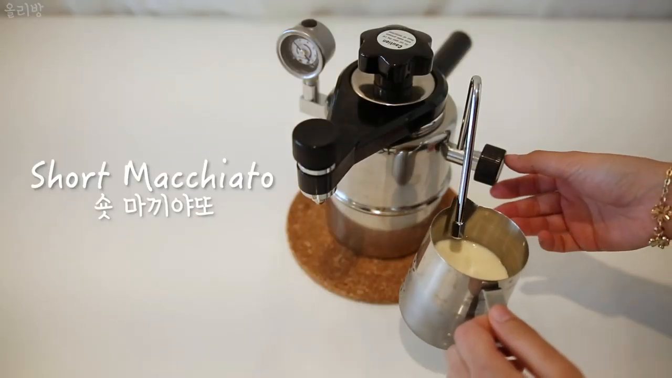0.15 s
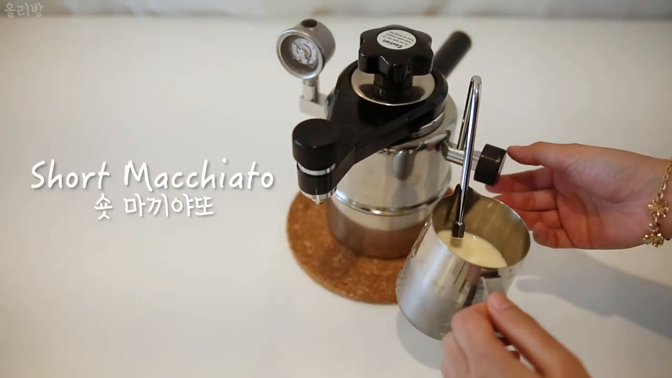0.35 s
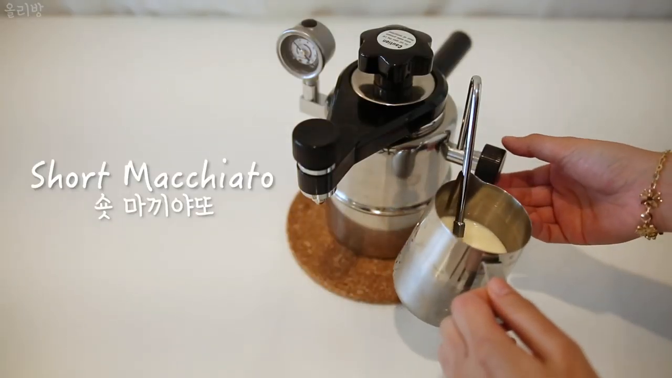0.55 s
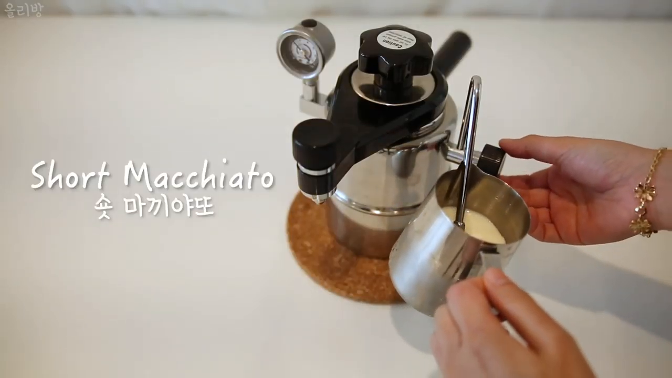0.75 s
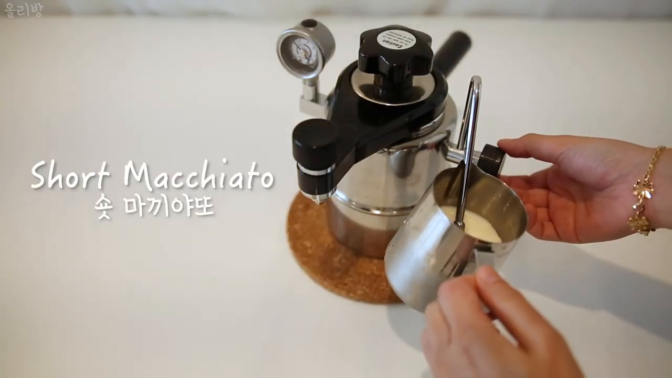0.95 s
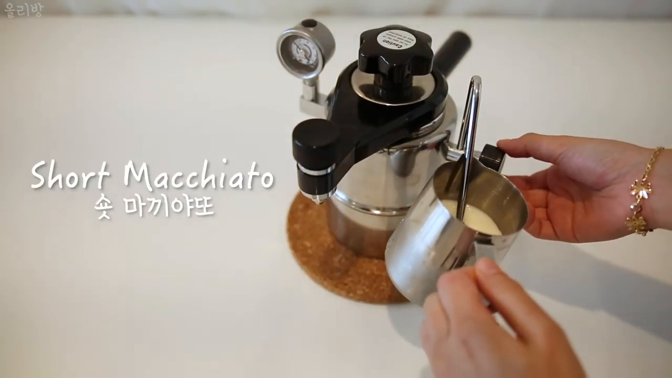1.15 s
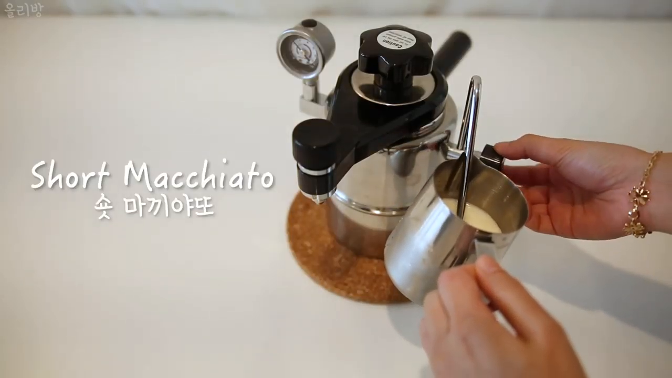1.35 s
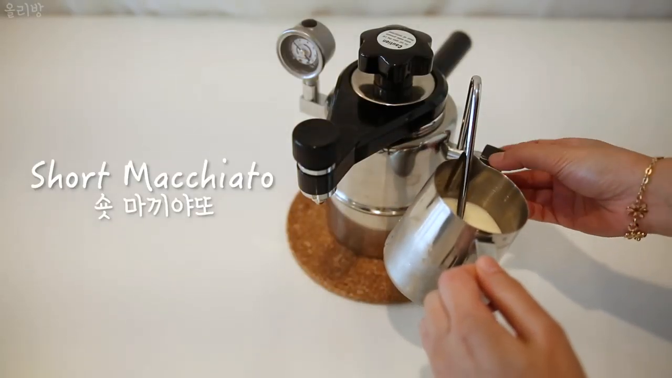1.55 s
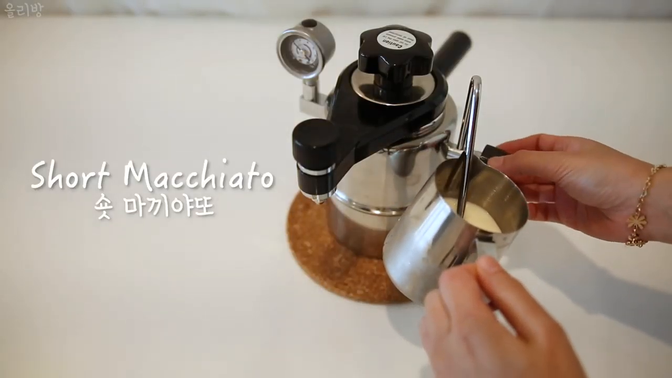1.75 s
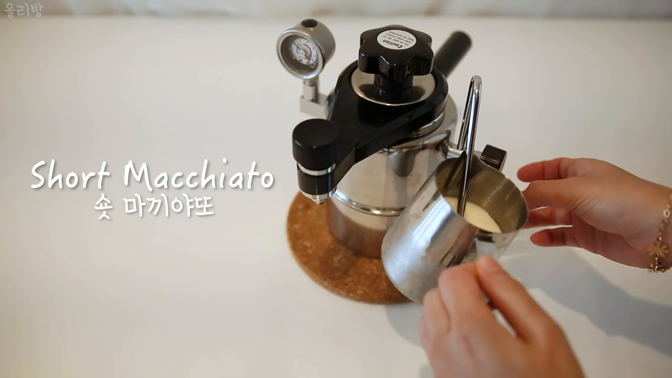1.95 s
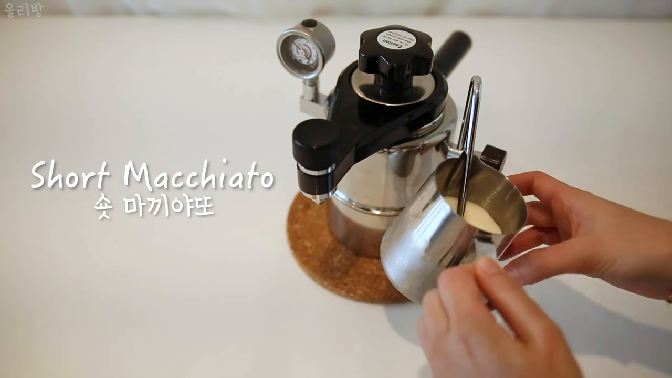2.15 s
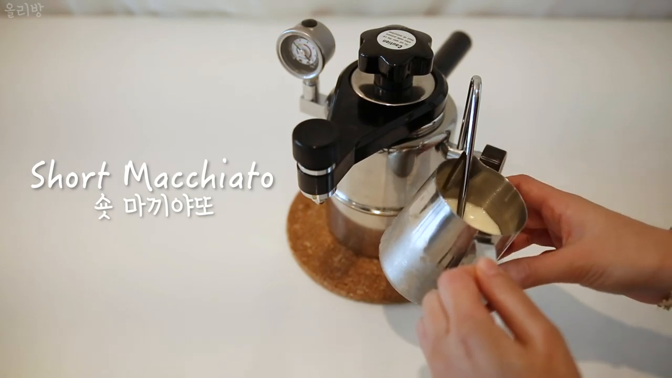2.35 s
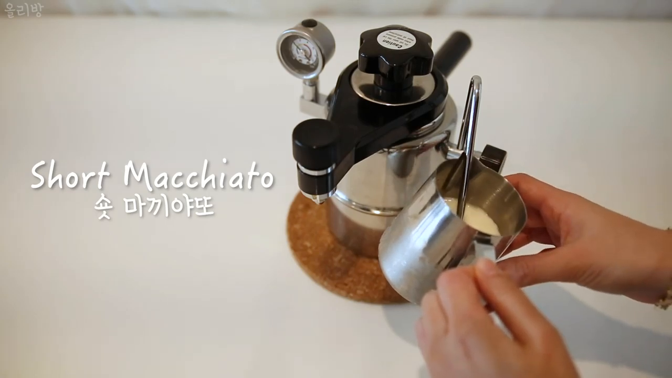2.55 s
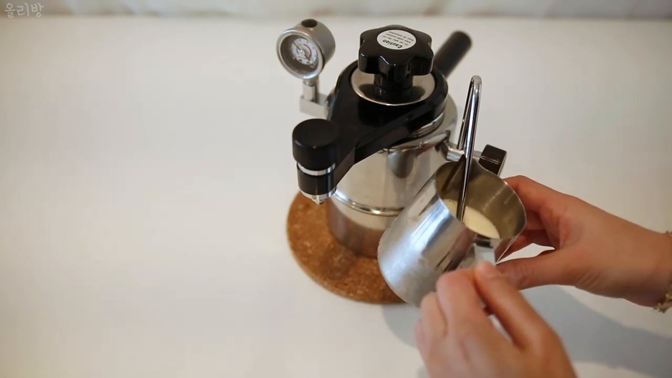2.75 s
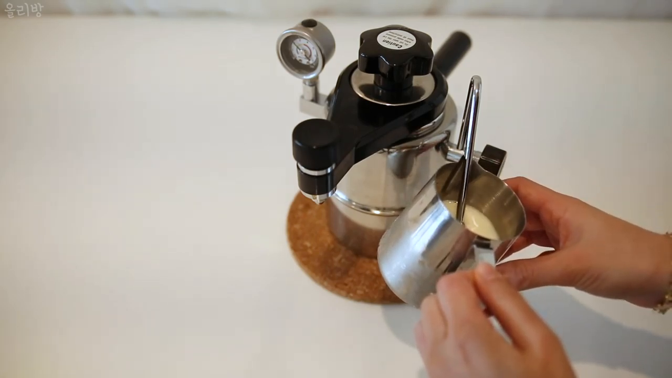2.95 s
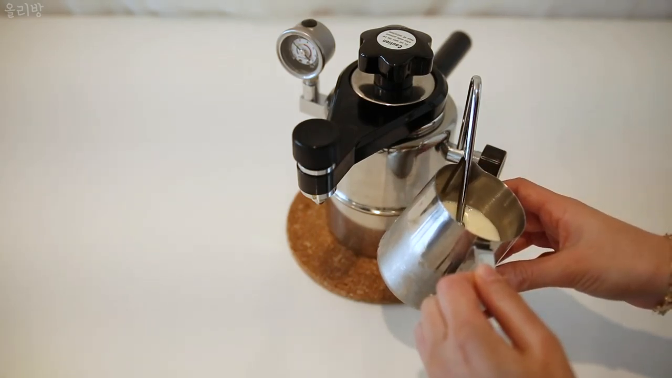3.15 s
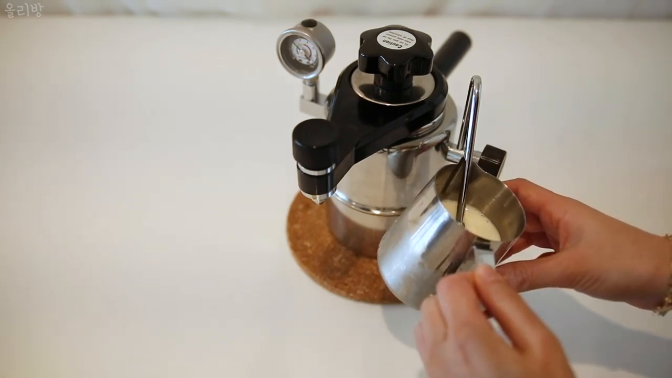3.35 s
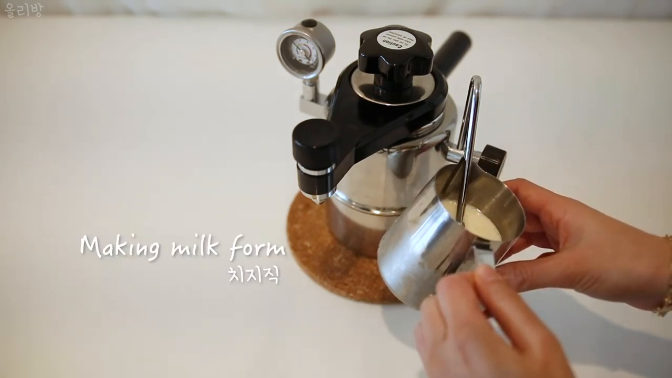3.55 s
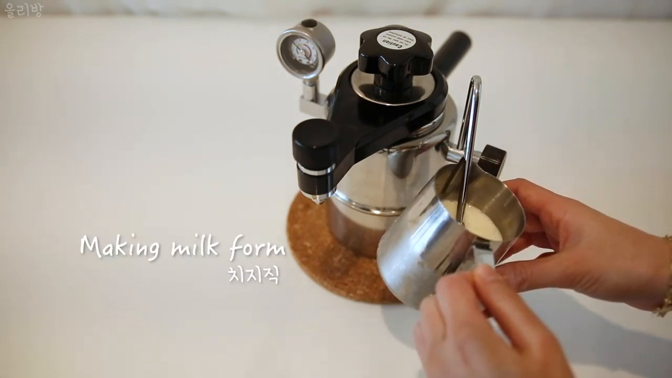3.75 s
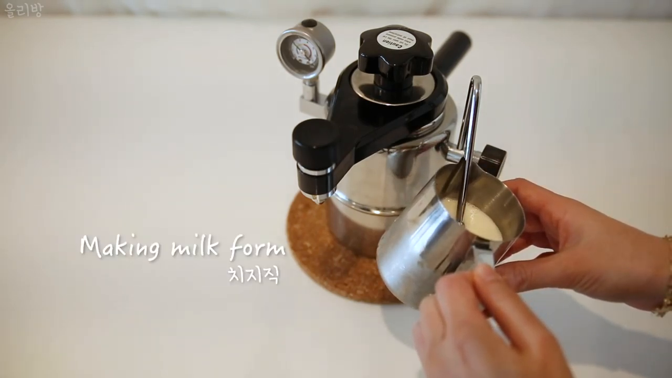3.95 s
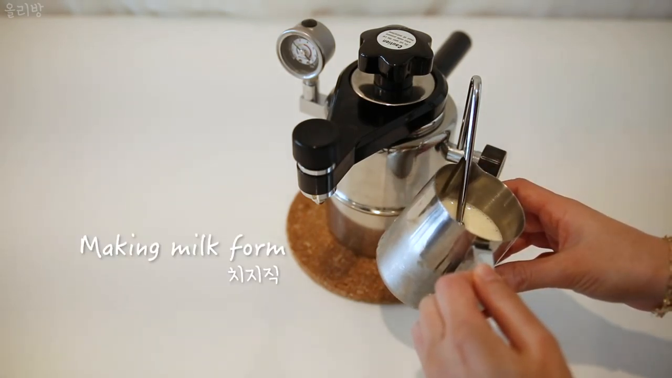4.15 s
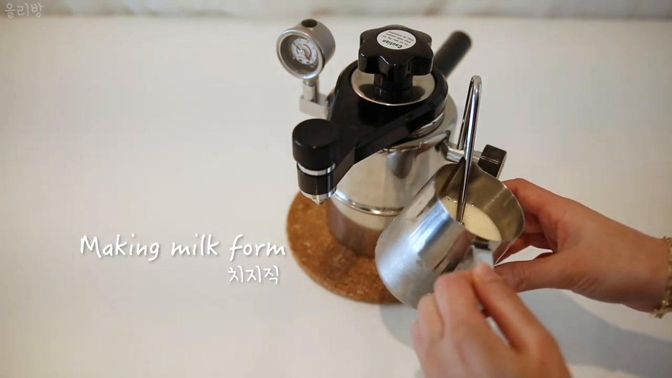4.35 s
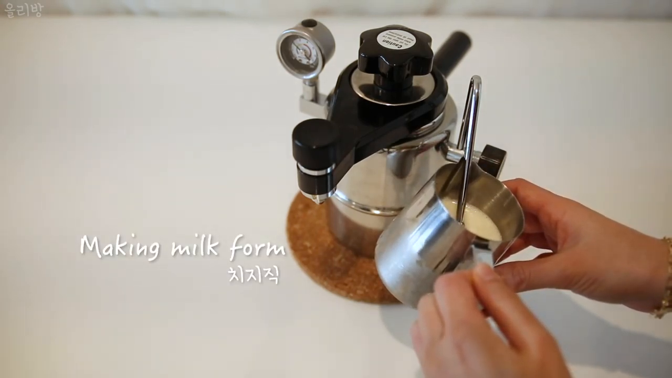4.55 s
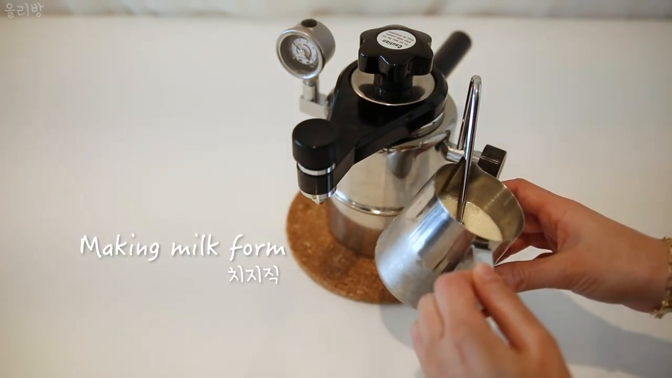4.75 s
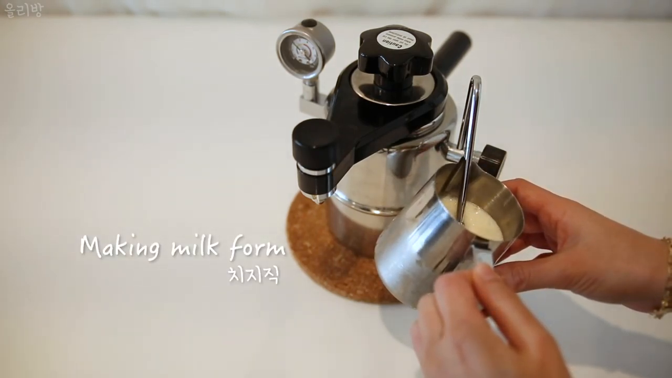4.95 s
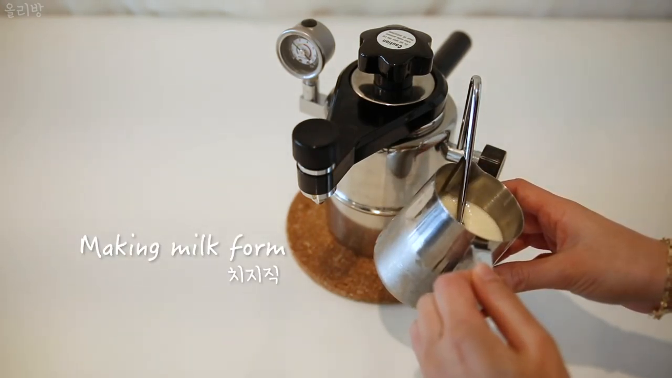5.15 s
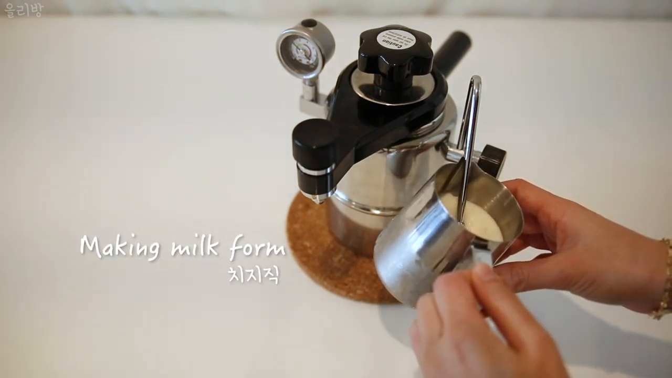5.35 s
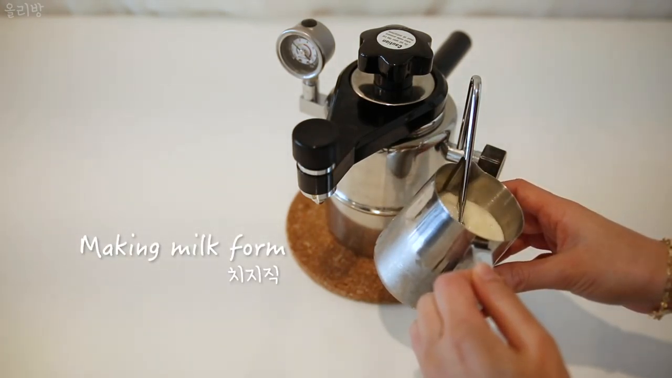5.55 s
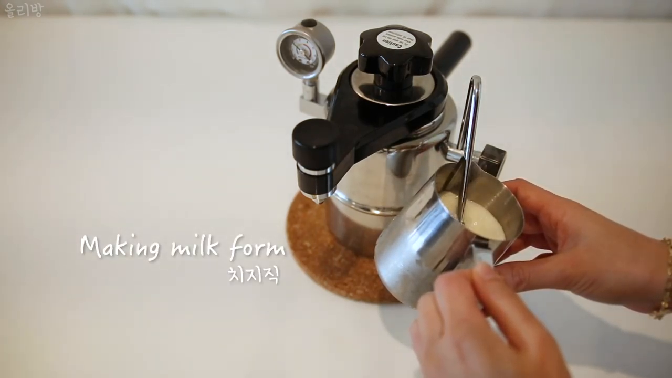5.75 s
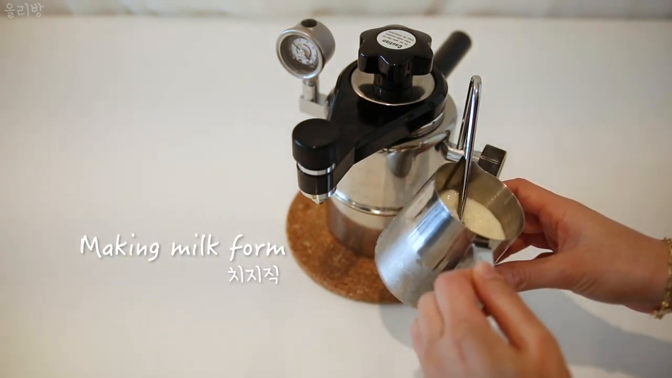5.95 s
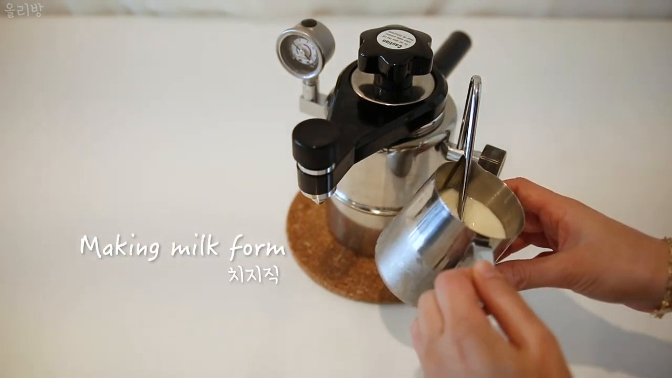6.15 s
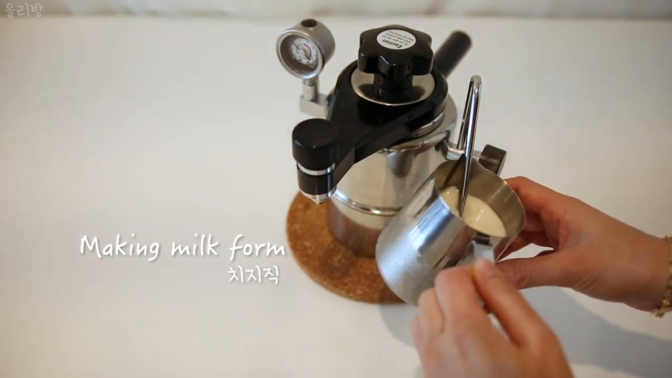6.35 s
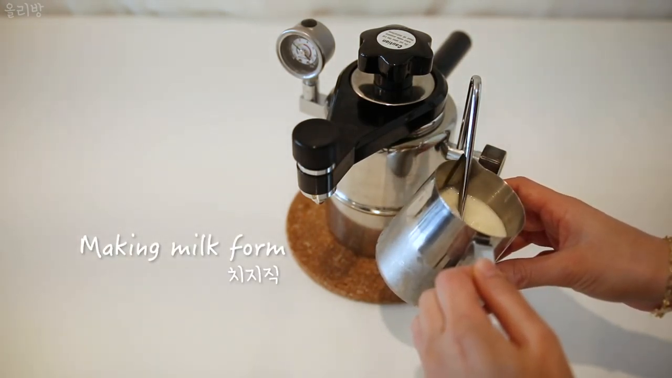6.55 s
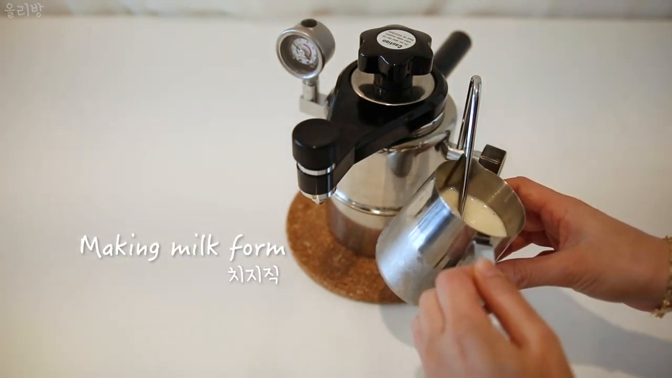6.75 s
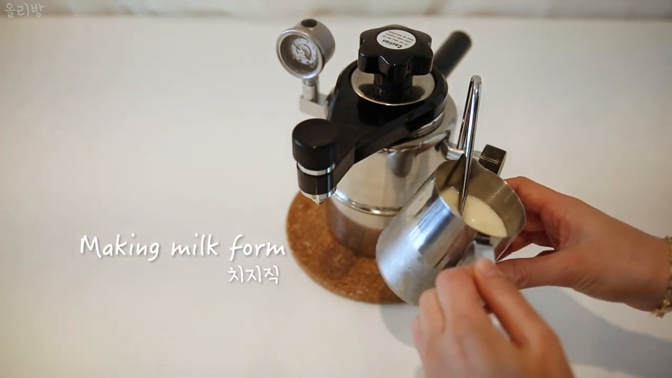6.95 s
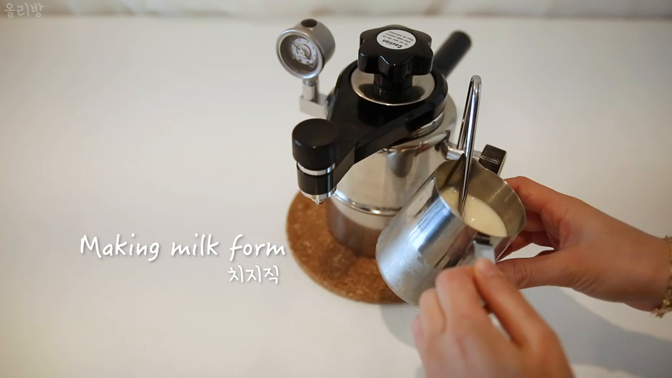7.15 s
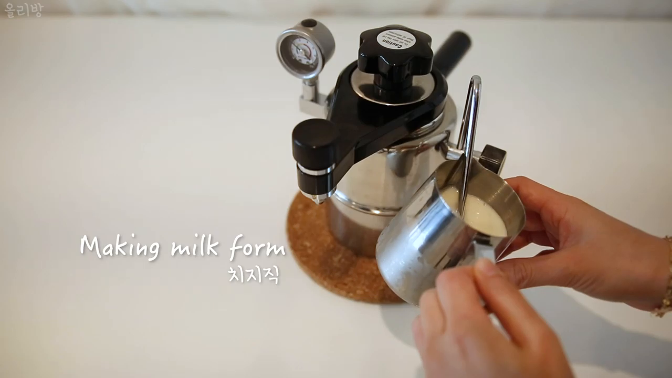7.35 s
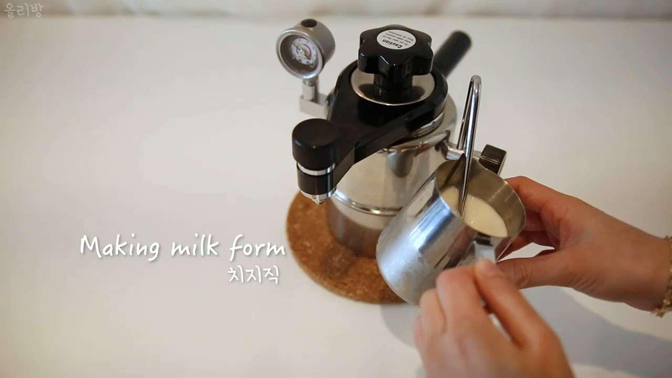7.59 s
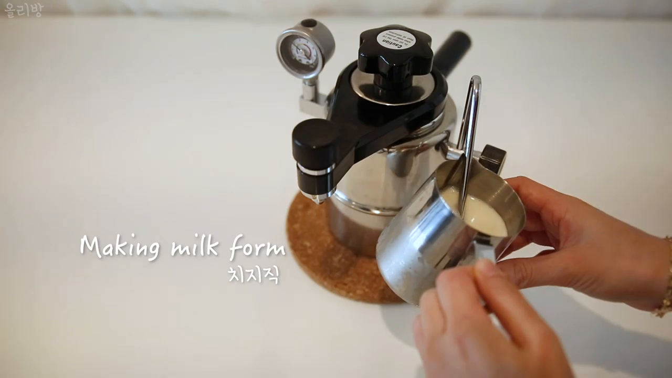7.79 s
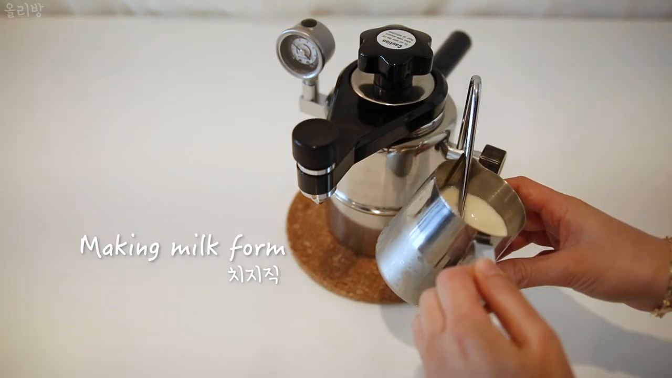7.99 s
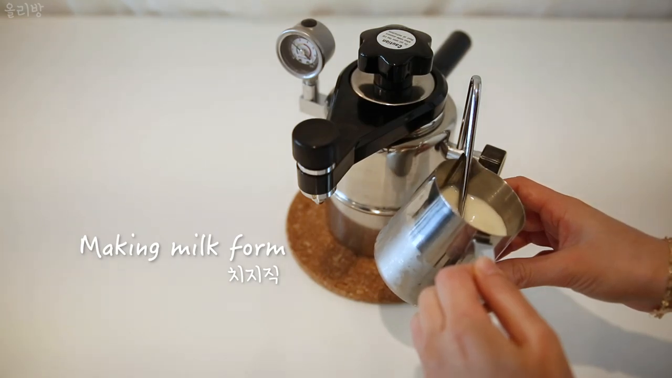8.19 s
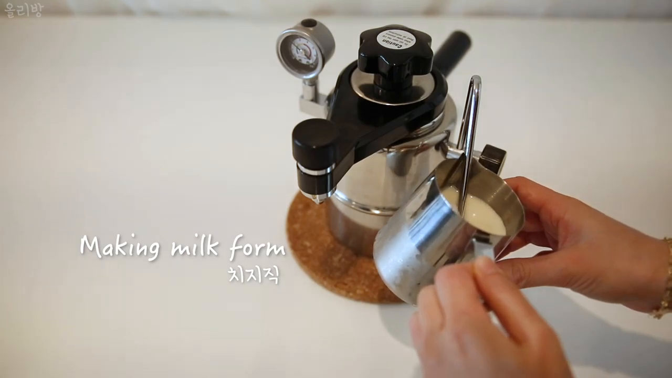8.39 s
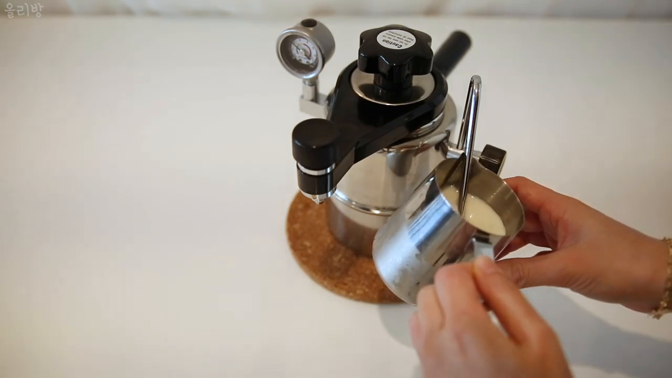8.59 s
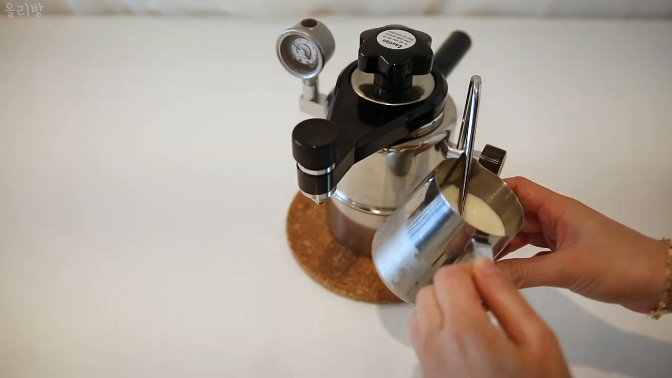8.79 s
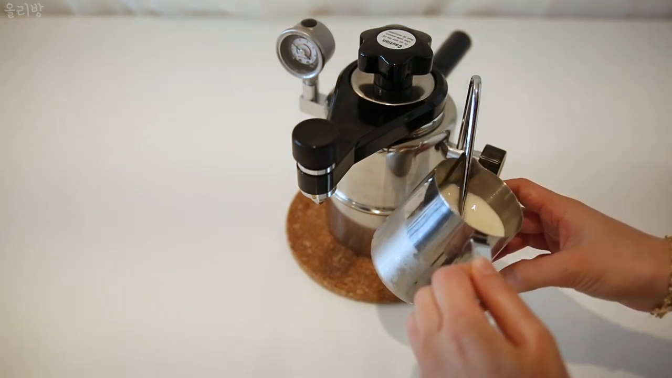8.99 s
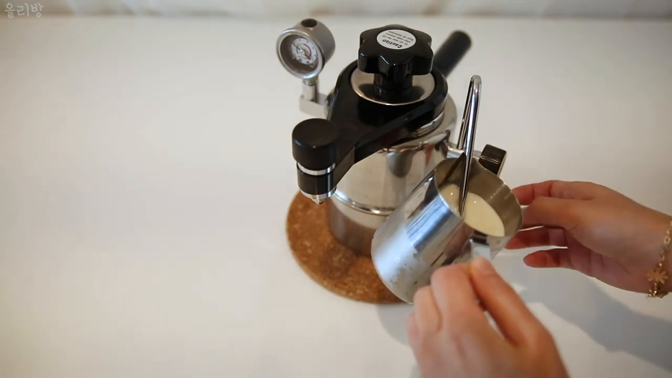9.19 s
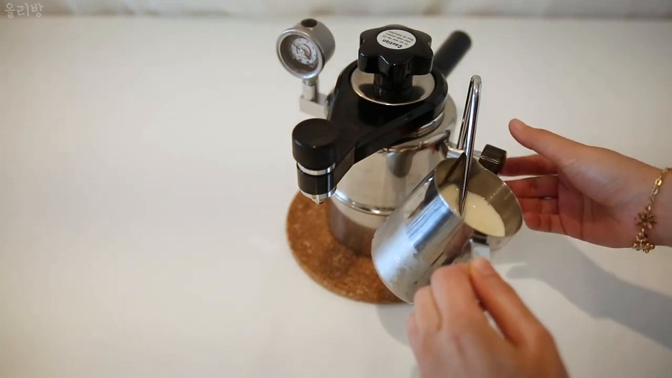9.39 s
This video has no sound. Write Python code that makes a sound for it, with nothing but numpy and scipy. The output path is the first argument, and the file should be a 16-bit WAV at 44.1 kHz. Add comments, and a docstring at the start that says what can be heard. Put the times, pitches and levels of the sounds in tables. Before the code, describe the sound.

A quiet kitchen with dull room noise and very faint mains hum, heard close in mono. At 0.35 s a thin steel pitcher strikes a metal wand with a bright, quick double clink, ringing briefly; faint milk lapping rises in pitch from 0.45 to 0.8 s. At 1.4 s a valve knocks and steam bursts in: a hollow rush, a thin whistle and a rough squeal sweeping up from about 1.4 to 3.6 kHz by 1.75 s. From 2.2 to 3.3 s short, piercing yelps near 4 kHz stutter among spits. From 3.3 to 6 s, fizzing froth is broken by ragged tearing hisses, hollow gulps, small chirps at 4.15 s and low gurgles around 300-450 Hz. From 6 to 8 s it smooths into grainy, hollow bubbling with little bright spitting. After 8.2 s it becomes softer, with one sharp spit at 9.15 s, continuing to about 9.4 s.

```python
"""In a quiet kitchen, a steel pitcher of milk taps a steam wand and is raised over its tip; the valve opens.
Steam pockets collapsing in cold milk squeal as rough bands of noise with overtones, under a thin whistle.
Air torn in at the surface fizzes and hisses as bursts of clicks; trapped pockets gurgle, chirp and crack.
Gain tables and decaying modes give the pitcher's air column and wall; room noise and mains hum lie below."""
import sys
import numpy as np
from scipy import signal
from scipy.fft import rfft, irfft, next_fast_len
from scipy.io import wavfile

SR = 44100
rng = np.random.default_rng(int(sys.argv[2]) if len(sys.argv) > 2 else 0)


def inscribe(sig):
    """Save sig as 16-bit PCM at rate SR to the path in sys.argv[1].

    A 1-D sig is mono; a 2-D sig holds one channel per row.
    Samples are clipped to [-1, 1] before scaling.
    """
    pcm = np.round(np.clip(np.atleast_2d(sig).T, -1, 1) * 32767)
    wavfile.write(sys.argv[1], SR, pcm.astype(np.int16))


N = 415863   # samples


def from_db(db):
    """Logarithmic level: 20 dB is a tenfold amplitude."""
    return 10 ** (np.asarray(db) / 20)


def rms_one(x):
    """Normalization by the root mean square."""
    return x / np.sqrt(np.mean(x ** 2) + 1e-20)


def in_time(rows):
    """Linear interpolation of a curve's columns over time, with a gate open while the curve lasts."""
    s, *columns = np.transpose(rows)
    t = np.arange(N) / SR
    gate = np.clip(np.minimum(t - s[0], s[-1] + .02 - t) / .003, 0, 1)
    return [np.interp(t, s, c) for c in columns] + [gate]


def at_hz(points, hz):
    """Interpolation on a logarithmic frequency axis."""
    table_hz, values = np.transpose(points)
    return np.interp(np.log(hz), np.log(table_hz), values)


def drift(rate, size=16):
    """Slow random modulation: sparse noise through a double one-pole low-pass at rate Hz, then rms 1."""
    r = np.exp(-2 * np.pi * size * rate / SR)
    draws = rng.standard_normal(N // size + 3002)
    slow = signal.lfilter([1], [1, -2 * r, r * r], draws)[3000:]
    return np.interp(np.arange(N) / size, np.arange(len(slow)), rms_one(slow))


def band_pass(x, low_hz, high_hz, order=2):
    """Butterworth band-pass filtering."""
    return signal.sosfilt(signal.butter(order, [low_hz, high_hz], "band", fs=SR, output="sos"), x)


def high_pass(x, hz, order=4):
    """Butterworth high-pass filtering."""
    return signal.sosfilt(signal.butter(order, hz, "high", fs=SR, output="sos"), x)


def decay(clicks, t60):
    """Exponential decay: each click leaves an envelope that falls 60 dB in t60 seconds."""
    return signal.lfilter([1], [1, -from_db(-60 / (t60 * SR))], clicks + 1e-18)


def shape(x, spectrum):
    """Linear filtering by a table of gains in dB, applied in the frequency domain."""
    size = next_fast_len(N)
    hz = np.maximum(np.arange(size // 2 + 1) * SR / size, 1)
    return irfft(rfft(x, size) * from_db(at_hz(spectrum, hz)), size)[:N]


def colour(x, spectrum):
    """Spectral shaping with the level held: the result has rms 1."""
    return rms_one(shape(x, spectrum))


def grains(per_s, spread_db):
    """Random impulse train: bubbles of uneven size burst independently."""
    sizes = from_db(spread_db * np.minimum(rng.exponential(1, N), 5)) * rng.choice([-1, 1], N)
    return rms_one(sizes * (rng.random(N) < per_s / SR))


def patchy(source, low_hz, high_hz, shared_db, own_db, rate):
    """Band-wise modulation: third-octave bands flicker partly together and partly each on its own."""
    out, together = 0, drift(rate)
    edges = low_hz * 2 ** np.arange(0, np.log2(high_hz / low_hz) + 1 / 3, 1 / 3)
    for k, (low, high) in enumerate(zip(edges, np.minimum(edges[1:], .45 * SR))):
        flicker = from_db(shared_db * together + own_db * drift(rate))
        out = out + (-1) ** k * band_pass(source, low, high) * flicker
    return out


def smear(hz, width_hz):
    """Quadrature modulation: low-passed noise is moved to a given centre frequency; rms 1."""
    lowpass = signal.butter(3, width_hz / 2, fs=SR, output="sos")
    a, b = signal.sosfilt(lowpass, rng.standard_normal((2, N)))
    phase = 2 * np.pi * np.cumsum(hz) / SR
    return rms_one(a * np.cos(phase) + b * np.sin(phase))


def burst(s, length, attack_s, release_s):
    """Linear envelope: a burst's samples, progress through it (0-1), and attack-hold-release shape."""
    at = np.arange(int(s * SR), min(int((s + length) * SR), N))
    t = at / SR - s
    return at, t / length, np.clip(np.minimum(t / attack_s, (length - t) / release_s), 0, 1)


def ring(force, hz, t60):
    """Damped resonance: a unit click sets a decaying sine of starting height 1 ringing."""
    r, w = from_db(-60 / (t60 * SR)), 2 * np.pi * hz / SR
    return signal.lfilter([0, np.sin(w)], [1, -2 * r * np.cos(w), r * r], force + 1e-18)


# spectrum of the room noise: f/Hz, relative level per Hz/dB
KITCHEN_SPECTRUM = [(44, -31.5), (75, -8), (188, -2), (311, -8), (344, -1), (446, -15), (523, -9.5),
                    (579, -17.5), (751, -10), (974, -18), (1140, -21), (9000, -35), (11700, -80.5)]
# room noise and hum as heard, fainter under the loud steam, then returning:
# t/s, noise level/dB, mains line level/dB
HUM_LEVELS = [(0, -72.5, -76), (1.45, -72, -78), (1.6, -77, -86), (2.3, -84.5, -87.5), (3.5, -73.5, -78),
              (5, -73, -81), (6.5, -69.5, -77), (9.43, -72, -74)]
MAINS_HZ = 48.6


def kitchen():
    """Superposition of broadband and tonal sound: dull room noise and a mains hum."""
    noise_db, line_db, _ = in_time(HUM_LEVELS)
    line = np.sqrt(2) * np.sin(2 * np.pi * MAINS_HZ * np.arange(N) / SR)
    noise = colour(rng.standard_normal(N), KITCHEN_SPECTRUM)
    return line * from_db(line_db + .8 * drift(3)) + from_db(noise_db) * noise


# strikes on the metal: pitcher touching the wand, then the valve's opening knock (1.422 s):
# t/s, strike level/dB, brightness/dB per octave about 1300 Hz
TAP_STRIKES = [(0.344, -13, -0.5), (0.349, -10, 0.5), (0.373, -19, 2), (0.559, -44, -3), (1.422, -25, 1)]
# modes of the pitcher's steel wall: f/Hz, relative level/dB, t60 when tapped/s
WALL_MODES = [(560, -16, .1), (1000, -12, .2), (1340, 0, .17), (1916, -14, .28), (3310, -4, .33),
              (3680, -11, .4), (4300, -15, .3), (4980, -16, .4), (6170, -20, .2), (7300, -16, .2),
              (8113, -8, .18), (8650, -9, .11), (13500, -28, .15)]
# spectrum of the clatter: f/Hz, relative level per Hz/dB
CLATTER_SPECTRUM = [(350, -71), (548, -15), (830, -33), (1320, -4.5), (1480, -21), (2580, -36), (3280, -26),
                    (6750, -23.5), (8170, -15), (16000, -55)]
# decay of the clatter: f/Hz, t60/s
CLATTER_DECAY = [(400, 0.11), (1100, 0.32), (3000, 0.5), (8000, 0.26), (15000, .15)]


def taps():
    """Modal impact: each strike excites the wall's modes and leaves a clatter that dies band by band."""
    s, strike_db, bright_db = np.transpose(TAP_STRIKES)
    at, out = (s * SR).astype(int), np.zeros(N)
    strength_db = rng.normal(0, 2.5, (len(at), len(WALL_MODES)))
    for k, (hz, mode_db, t60) in enumerate(WALL_MODES):
        clicks = np.zeros(N)
        tilt_db = bright_db * np.log2(hz / 1300)
        clicks[at] = from_db(strike_db + mode_db - 15 + tilt_db + strength_db[:, k])
        out += ring(clicks, hz, t60) * from_db(4.0 * drift(22))   # the moving milk unsettles the ring
    noise = colour(rng.standard_normal(N), CLATTER_SPECTRUM)
    edges = 350 * 2 ** np.arange(0, 5.6, .5)   # half-octave bands
    for low, high in zip(edges, edges[1:]):
        hz, clicks = np.sqrt(low * high), np.zeros(N)
        clicks[at] = from_db(strike_db + bright_db * np.log2(hz / 1300))
        tail = decay(clicks, at_hz(CLATTER_DECAY, hz))
        crack = decay(clicks, 0.032)
        out += band_pass(noise, low, high) * (from_db(-21) * tail + from_db(-8) * crack)
    return high_pass(out, 470)   # the small pitcher radiates no bass


WALL_RADIATES_FROM_HZ = 2070


def wall(force, damping):
    """Forced modal vibration: the upper wall modes, shaken through the milk; damping scales each t60."""
    modes = 0
    for hz, mode_db, t60 in WALL_MODES[4:]:
        like_gain = np.sqrt(damping * t60 * SR / 27.6)   # evens out the modes' response to white force
        modes = modes + from_db(mode_db / 2) * ring(force, hz, damping * t60) / like_gain
    return high_pass(modes, WALL_RADIATES_FROM_HZ)


# milk lapping as the pitcher rises and its air column shortens: t/s, f/Hz, level/dB
LAPPING_CURVE = [(0.44, 1310, -48), (0.536, 1404, -63), (0.566, 1414, -45.5), (0.584, 1444, -54),
                 (0.712, 1550, -70.5), (0.726, 1650, -57), (0.82, 1626, -92)]


def lapping():
    """Air-column resonance: small waves sound the column and nudge the wall."""
    hz, level_db, gate = in_time(LAPPING_CURVE)
    level = gate * from_db(level_db + 1.0 * drift(60))
    nudge = signal.lfilter([.3], [1, -.7], level * rng.standard_normal(N))
    return level * smear(hz, width_hz=300) + from_db(-9) * wall(nudge, damping=0.5)


# milk churned by the buried jet: t/s, fizz level/dB, air column level/dB
FROTH_LEVELS = [(1.415, -77, -52), (1.421, -53, -31.5), (1.461, -42.5, -23.5), (1.585, -27, -38.5),
                (1.875, -45.5, -52), (2.139, -38, -52), (2.223, -38, -79), (2.62, -41, -66.5),
                (2.76, -35, -57), (2.93, -39, -66), (3.21, -34.5, -50), (3.8, -35, -57),
                (3.95, -28.5, -43.5), (4.33, -31, -53), (4.82, -38, -42.5), (4.88, -30.5, -42),
                (5.17, -31.5, -45), (5.46, -37, -44.5), (6.28, -33.5, -43), (6.7, -28.5, -38.5),
                (7.0, -32.5, -41.5), (7.05, -35, -48.5), (7.1, -33.5, -40.5), (7.4, -32, -39.5),
                (7.9, -31.5, -39.5), (8.2, -39, -47.5), (9.43, -40, -49.5)]
# spectrum of the small bursts: f/Hz, relative level per Hz/dB
FIZZ_SPECTRUM = [(1200, -29), (2100, -9), (3300, 0), (4500, 4), (6000, 1), (7500, -4.5), (9500, -15.5),
                 (11700, -14.5), (13000, -38.5), (14500, -50)]
# spectrum of the pitcher's air column: f/Hz, relative level per Hz/dB
COLUMN_SPECTRUM = [(500, -40), (850, -32.5), (993, -0.5), (1080, -0.5), (1320, 9), (1510, 7), (1700, -9),
                   (1840, 2.5), (1950, 1), (2480, -10.5), (3030, -13), (3200, -1.5), (4160, -60)]
# way out of the milk through the pitcher's wall and mouth: f/Hz, gain/dB
WAY_OUT_GAINS = [(880, -42.5), (1080, 2.5), (1400, 7), (1680, -16), (2000, 6), (2250, 1), (2480, -2),
                 (3090, -4.5), (3300, 0.5), (4400, -1.5), (5200, 1), (5500, -6), (6230, 0), (7300, -2),
                 (8700, 5), (9500, -5), (11000, -1.5)]
TORN_FIZZ_DB = -9   # fizz that the tearing adds, against its hiss
# the coarse end of the fizz thins out when the air column falls this far under it
COARSE_BELOW_HZ, COARSE_FOLLOWS, COARSE_FULL_DB = 2980, 0.82, -9   # COARSE_FOLLOWS is an exponent


def froth(tears, torn_column):
    """Bubble noise: dense small bursts fizz, more so when air is torn in; larger ones sound the column."""
    fizz_db, column_db, gate = in_time(FROTH_LEVELS)
    column = gate * from_db(column_db) + torn_column
    small = patchy(grains(14000, 2.7), 1436, 14000, shared_db=0.5, own_db=2.0, rate=20.6)
    small = colour(colour(small, FIZZ_SPECTRUM), WAY_OUT_GAINS)
    coarse = signal.sosfiltfilt(signal.butter(8, COARSE_BELOW_HZ, fs=SR, output="sos"), small)
    share = np.minimum(column / from_db(fizz_db + COARSE_FULL_DB), 1) ** COARSE_FOLLOWS
    fizz_level = gate * from_db(fizz_db) + from_db(TORN_FIZZ_DB) * tears
    fizz = fizz_level * (small - (1 - share) * coarse)
    large = patchy(grains(5000, 3.9), 642, 3300, shared_db=0.5, own_db=1.8, rate=23.0)
    return fizz + column * colour(large, COLUMN_SPECTRUM)


# large air pockets pinching off under the milk: t/s, level/dB, starting f/Hz, hold/s
GURGLE_POCKETS = [(1.439, -44.5, 717, 0.015), (3.296, -57, 450, 0.058), (3.421, -71, 430, 0.061),
                  (3.554, -61, 427, 0.026), (3.621, -53.5, 412, 0.06), (3.876, -68, 428.3, 0.065),
                  (3.956, -61, 435, 0.031), (4.017, -67, 430, 0.034), (4.181, -56.5, 442, 0.0096),
                  (4.433, -42, 425, 0.01), (4.463, -46, 370, 0.0069), (4.491, -51, 340.4, 0.015),
                  (4.665, -46.5, 401.5, 0.023), (5.084, -57.5, 379, 0.038), (5.276, -53, 353, 0.042),
                  (5.378, -42, 295, 0.023), (5.426, -42, 328, .015), (5.465, -58, 331, 0.043),
                  (5.55, -42.5, 365, 0.06), (5.666, -47.5, 322, 0.046), (5.797, -60.5, 330, 0.057),
                  (5.87, -49.5, 283, 0.032)]
GURGLE_ATTACK_S, GURGLE_T60_S = 0.0073, 0.13
GURGLE_SAG_HZ_PER_S = 550   # the pitch sags as a pocket grows
SMALL_POCKETS_DB = -2.5   # small pockets that come with each large one, against it
# small pockets once foam forms, against the torn air column; they fade with time
FOAM_FROM_S, FOAM_POCKETS_DB, FOAM_FADE_DB_PER_S = 3.5, -27, 0.3


def gurgle(torn_column):
    """Bubble resonance: air pockets ring briefly as rough bands around the pitch that their size gives."""
    level, hz, t = np.zeros(N), np.zeros(N), np.arange(N) / SR
    for s, level_db, pocket_hz, hold in GURGLE_POCKETS:
        length = GURGLE_ATTACK_S + hold + GURGLE_T60_S
        at, _, swell = burst(s, length, GURGLE_ATTACK_S, GURGLE_ATTACK_S)
        since_hold = np.maximum(t[at] - s - GURGLE_ATTACK_S - hold, 0)
        level[at] += swell ** 2 * from_db(level_db - 60 * since_hold / GURGLE_T60_S)
        hz[at] = pocket_hz - GURGLE_SAG_HZ_PER_S * (t[at] - s)
    large = level * from_db(0.56 * drift(24.77)) * smear(hz, width_hz=92)
    foam = (t > FOAM_FROM_S) * from_db(FOAM_POCKETS_DB - FOAM_FADE_DB_PER_S * (t - FOAM_FROM_S))
    small_level = from_db(SMALL_POCKETS_DB) * level + foam * torn_column
    small = smear(np.full(N, 760.), width_hz=248)
    return large + small_level * from_db(2.0 * drift(32)) * small


# steam pocket at the nozzle: t/s, collapse rate f/Hz, level/dB, extra level of overtones/dB
SQUEAL_CURVE = [(1.44, 1407, -28, -38), (1.48, 1500, -26.5, -19), (1.525, 2150, -30.5, -9),
                (1.565, 2485, -28, -10.5), (1.615, 3033, -28.5, -10), (1.74, 3600, -32.5, 2.5),
                (1.9, 3580, -37, 8.5), (2.14, 3650, -32.5, 0.5), (2.15, 4020, -43, -3),
                (2.5, 4333, -39, -7.5), (2.8, 4483, -38, -6.5), (2.9, 4030, -42, -3.5),
                (3.15, 4243, -47, -5), (3.4, 4200, -54, 9.5), (3.9, 3900, -63, -4), (3.96, 4300, -32, -19),
                (4.05, 3950, -66, 6), (9.1, 3950, -49.5, -14), (9.36, 3980, -42, -36),
                (9.43, 3920, -43, -16)]
# sudden louder squeals: t/s, level/dB, starting f/Hz, hold/s
YELP_EVENTS = [(2.183, -34.5, 4132, 0.00535), (2.24, -30.5, 3950, .006), (2.349, -29.5, 3950, 0.00468),
               (2.451, -29, 4090, 0.00492), (2.561, -38.5, 4500, 0.00817), (2.667, -36.5, 4282, 0.00443),
               (2.809, -41, 4515, 0.00714), (2.831, -30.5, 4502, 0.0021), (2.859, -30, 4294, .017),
               (2.881, -43, 3812, 0.00309), (2.967, -28, 4116, 0.00712), (3.141, -42, 4200, 0.00285),
               (3.185, -32, 4100, .008), (3.242, -37.5, 4400, 0.01017)]
# bands of the squeal: multiple of the pitch, relative level/dB, bandwidth/Hz
OVERTONE_BANDS = [(1, 4, 700), (2, 0.5, 850), (3, 2.5, 1700), (4, -10, 1300)]
YELP_ATTACK_S, YELP_RELEASE_S, YELP_SAG_HZ_PER_S = .003, .003, 48000
CUTOFF_HZ = 15850   # nothing of the squeal is centred above it; the output is cut there too


def squeal():
    """Cavity collapse at an unsteady rate: each overtone is a rough band with its own width."""
    hz, level_db, over_db, gate = in_time(SQUEAL_CURVE)
    level = from_db(level_db) * gate
    for s, yelp_db, yelp_hz, hold in YELP_EVENTS:
        length = YELP_ATTACK_S + hold + YELP_RELEASE_S
        at, _, swell = burst(s, length, YELP_ATTACK_S, YELP_RELEASE_S)
        falling_hz = yelp_hz - YELP_SAG_HZ_PER_S * (at / SR - s)
        hz[at] += (falling_hz - hz[at]) * swell
        level[at] += from_db(yelp_db) * swell
    hz *= 1 + .012 * drift(30)   # the rate wanders
    bands = 0
    for k, band_db, width_hz in OVERTONE_BANDS:
        band_level = from_db(band_db + over_db * (k > 1)) * (k * hz < CUTOFF_HZ)
        bands = bands + band_level * smear(k * hz, width_hz)
    sound = shape(level * from_db(2.15 * drift(120, size=4)) * bands, WAY_OUT_GAINS)
    return sound + from_db(-16.0) * wall(sound, damping=0.088)


# steady spit of steam at the surface: t/s, hiss level/dB
TEARING_LEVELS = [(1.455, -55), (1.48, -34), (1.6, -27), (1.672, -37), (2.09, -30.5), (2.16, -42.5),
                  (2.92, -41), (3.23, -32.5), (3.7, -34), (4.05, -46.5), (4.3, -34.5), (4.8, -40.5),
                  (5.3, -37.5), (5.82, -54), (6.79, -53), (7.09, -63), (7.82, -56), (8.1, -86), (9.43, -82)]
# spectrum of the hiss: f/Hz, relative level per Hz/dB
HISS_SPECTRUM = [(3820, -31), (6500, -31), (7840, 2), (8860, -4.5), (9490, -10), (9970, -3.5), (12300, 3.5),
                 (13100, -3.5), (13500, 6), (13900, 1), (15200, -2), (16200, -38)]


def tearing(tears):
    """Jet noise: free steam over the surface gives a bright, spitting hiss."""
    hiss_db, gate = in_time(TEARING_LEVELS)
    spit = patchy(grains(16000, 4.0), 5840, 17000, shared_db=0.3, own_db=3.0, rate=16.7)
    return (gate * from_db(hiss_db) + tears) * colour(spit, HISS_SPECTRUM)


# thin whistle of the nozzle as the valve opens: t/s, f/Hz, level/dB
WHISTLE_CURVE = [(1.455, 8100, -50), (1.48, 8340, -25), (1.55, 8760, -36), (1.65, 8900, -30),
                 (1.7, 9200, -45)]


def whistle():
    """Nozzle whistle: a narrow band of noise climbs with the pressure."""
    hz, level_db, gate = in_time(WHISTLE_CURVE)
    return gate * from_db(level_db) * smear(hz, width_hz=500)


# resonance of the pitcher's air under the squeal: t/s, f/Hz, level/dB
AIR_RESONANCE_CURVE = [(1.7, 1810, -73), (1.93, 1864, -43.5), (2.13, 1984, -45), (2.17, 2010, -62),
                       (2.65, 2010, -68)]


def air_resonance():
    """Resonance: a narrow rough band near 1.8-2 kHz in the pitcher's air, under the squeal."""
    hz, level_db, gate = in_time(AIR_RESONANCE_CURVE)
    return gate * from_db(level_db + 2.8 * drift(30)) * smear(hz, width_hz=140)


# single bubbles that swell or shrink: t/s, level/dB, starting f/Hz, final f/Hz, length/s
CHIRP_EVENTS = [(2.555, -51, 3000, 1360, 0.0093), (4.127, -31.5, 2130, 3000, 0.0066),
                (4.159, -29, 4990, 1900, 0.011)]
CHIRP_EDGE_S = 0.0013


def chirps():
    """Bubble resonance with changing size: a tone glides exponentially within about ten milliseconds."""
    level, hz = np.zeros(N), np.zeros(N)
    for s, level_db, from_hz, to_hz, length in CHIRP_EVENTS:
        at, along, swell = burst(s, length, CHIRP_EDGE_S, CHIRP_EDGE_S)
        level[at] = swell * from_db(level_db)
        hz[at] = from_hz * (to_hz / from_hz) ** along
    return level * np.sqrt(2) * np.sin(2 * np.pi * np.cumsum(hz) / SR)


# the tip breaks the surface and tears air in:
# t/s, hiss level/dB, length/s, level change over the length/dB, air column level/dB
TEAR_EVENTS = [(2.558, -31, 0.018, -7, -48), (2.719, -29, 0.021, -1, -40), (2.737, -37, 0.035, -3, -54),
               (2.792, -36, 0.044, 1, -44.5), (2.857, -29.5, 0.031, 7, -50), (2.955, -40, 0.09, -12, -49),
               (3.03, -37, 0.12, -28, -42), (3.119, -33, 0.054, -14, -45),
               (3.241, -33.5, 0.14, -8.5, -33.5), (3.446, -45.5, 0.24, 9, -41),
               (3.867, -41, 0.085, -12, -39.5), (4.001, -54, 0.037, -12, -36.5),
               (4.163, -32, 0.033, 10, -38.5), (4.377, -30.5, 0.14, -1.5, -35.5),
               (4.595, -34.5, 0.033, 3, -34.5), (4.664, -31, 0.036, 10.5, -37), (4.734, -39, 0.02, -9, -36),
               (4.824, -35, 0.019, -9, -27.5), (4.922, -42, 0.021, -6, -43), (5.051, -38, 0.091, 10, -38),
               (5.175, -35.5, 0.14, 9, -35.5), (5.321, -34.5, 0.12, 7.5, -32.5),
               (5.471, -36.5, 0.12, 5.5, -39.5), (5.544, -30, 0.069, -1, -41), (5.631, -37, 0.038, 1, -36),
               (5.695, -28.5, 0.067, -10, -34.5), (5.765, -34, 0.058, -4, -40), (5.822, -58, 0.045, 2, -27),
               (5.861, -26.5, 0.015, 8, -39), (5.882, -32, 0.027, -12, -23.5), (5.904, -27, 0.04, 2, -35),
               (5.949, -30, 0.12, -15, -39), (6.063, -46, 0.033, 0, -30.5), (6.099, -31.5, 0.068, -8, -39),
               (6.155, -69, 0.087, -11, -31), (6.305, -44, 0.062, -6, -32), (6.429, -77, 0.11, -6, -38),
               (6.54, -65, 0.16, -11, -30), (6.817, -46, 0.039, 2, -34.5), (6.88, -50, 0.11, -2, -36),
               (7.12, -68, 0.075, -9, -39), (7.295, -40.5, 0.065, 4, -41.5), (7.573, -57, 0.099, -7, -45),
               (7.678, -51, 0.088, 1, -38.5), (7.83, -33.5, 0.043, 8, -41.5),
               (9.148, -30.5, 0.023, -12, -41)]
TEAR_ATTACK_S, TEAR_RELEASE_S = 0.0016, 0.017
# share of a tear's level change that the air column follows; how slowly it answers
COLUMN_FOLLOWS, COLUMN_LAG_S = 0.58, 0.013


def bare_tip():
    """Intermittent excitation: levels of hiss and air column, switched on while the tip is out of the milk."""
    hiss, column = np.zeros((2, N))
    for s, hiss_db, length, change_db, column_db in TEAR_EVENTS:
        at, along, bare = burst(s, length, TEAR_ATTACK_S, TEAR_RELEASE_S)
        hiss[at] += bare * from_db(hiss_db + change_db * along)
        column[at] += bare * from_db(column_db + COLUMN_FOLLOWS * change_db * along)
    lag = np.exp(-1 / (COLUMN_LAG_S * SR))
    return hiss, signal.lfilter([1 - lag], [1, -lag], column + 1e-18)


# gulps of air that make the air column ring at its pitch of the moment: t/s, level/dB, f/Hz, hold/s
GULP_EVENTS = [(2.562, -43.5, 1394, .008), (2.719, -36, 1467, 0.0089), (2.8, -48, 1250, 0.0097),
               (4.178, -29.5, 1248, 0.014), (4.397, -31.5, 1302, 0.064), (4.471, -30, 1290, 0.031),
               (4.668, -25.5, 1170, 0.015)]
GULP_ATTACK_S, GULP_RELEASE_S = 0.002, .02


def gulps():
    """Air-column resonance: each gulp is a short rough tone."""
    level, hz = np.zeros(N), np.zeros(N)
    for s, level_db, gulp_hz, hold in GULP_EVENTS:
        length = GULP_ATTACK_S + hold + GULP_RELEASE_S
        at, _, swell = burst(s, length, GULP_ATTACK_S, GULP_RELEASE_S)
        level[at], hz[at] = swell ** 2 * from_db(level_db), gulp_hz
    return level * smear(hz, width_hz=270)


# single bubbles that crack at the surface: t/s, starting level before the band-pass/dB
SPIT_EVENTS = [(2.802, -23), (2.817, -31), (5.638, -19.5), (5.867, -18), (9.145, -16.5)]


def spits():
    """Impulsive radiation: each crack is a few milliseconds of wide noise."""
    s, level_db = np.transpose(SPIT_EVENTS)
    clicks = np.zeros(N)
    clicks[(s * SR).astype(int)] = from_db(level_db)
    crack = decay(clicks, 0.016) * rng.standard_normal(N)
    return band_pass(crack, 1200, 14000, order=4)


# soft low bumps, each at its height 0.03 s after t: t/s, peak level/dB, f/Hz
BUMP_EVENTS = [(3.899, -56, 135), (8.990, -58, 125), (9.262, -62, 125)]


def bumps():
    """Gaussian tone burst: each bump swells for a few cycles and dies."""
    t, out = np.arange(N) / SR, np.zeros(N)
    for s, peak_db, hz in BUMP_EVENTS:
        swell = np.exp(-((t - s - .03) / 0.024) ** 2)
        out += from_db(peak_db) * swell * np.sin(2 * np.pi * hz * (t - s))
    return out


def nearby(x, echo_db, t60):
    """Early reflections: dense echoes off boiler, counter and wall leave a fixed fine spectral ripple."""
    t = np.arange(round(.25 * SR)) / SR
    echoes = rng.standard_normal(len(t)) * from_db(-60 * t / t60) * (t > .001)
    echoes = echoes / np.sqrt(np.sum(echoes ** 2))
    return x + from_db(echo_db) * signal.fftconvolve(x, echoes)[:N]


def scene():
    """Superposition: the steam's sounds gain echoes, then milk, taps, bumps and room are added."""
    tears, torn_column = bare_tip()
    steam = froth(tears, torn_column) + squeal() + tearing(tears) + whistle()
    steam += air_resonance() + chirps() + gulps() + spits()
    steam = high_pass(steam, 800, order=6)   # no steam sound passes under the air column
    milk = nearby(steam, echo_db=-10.0, t60=0.1) + gurgle(torn_column) + lapping()
    return (kitchen() + taps() + milk + bumps())[None]


def record(dry):
    """Band limiting: a steep elliptic low-pass cuts the top."""
    return signal.sosfilt(signal.ellip(10, .3, 75, CUTOFF_HZ, fs=SR, output="sos"), dry)


dry = scene()
out = record(dry)
inscribe(out)
```